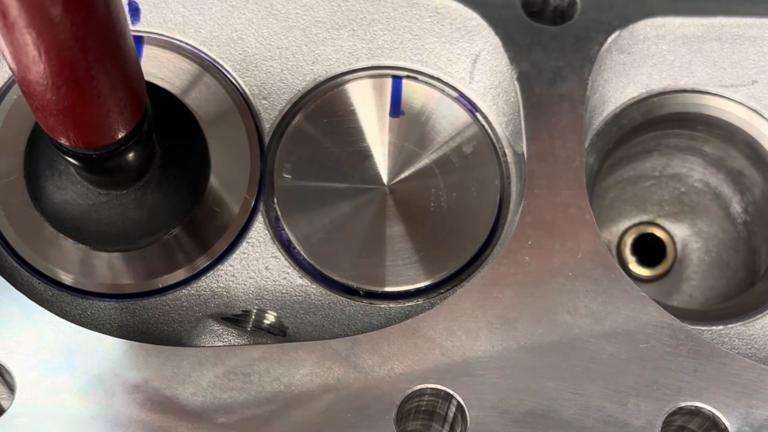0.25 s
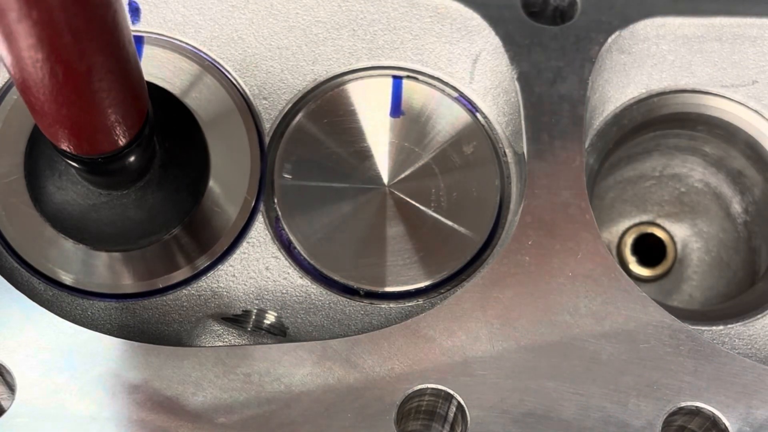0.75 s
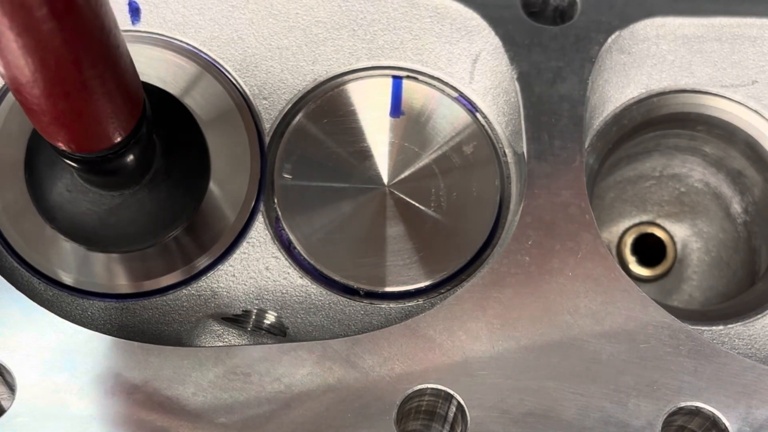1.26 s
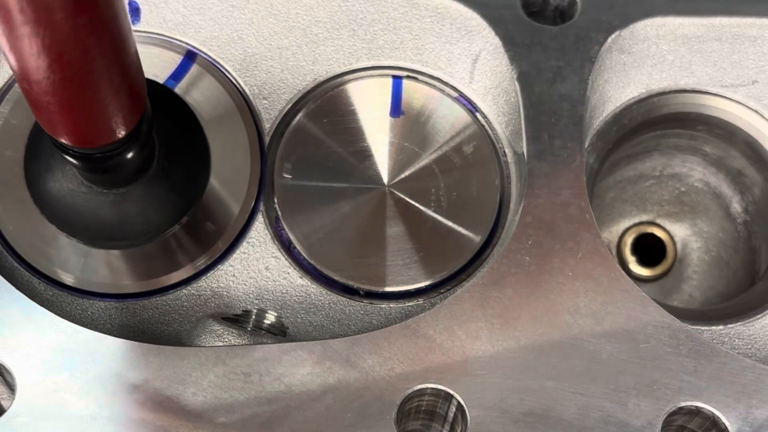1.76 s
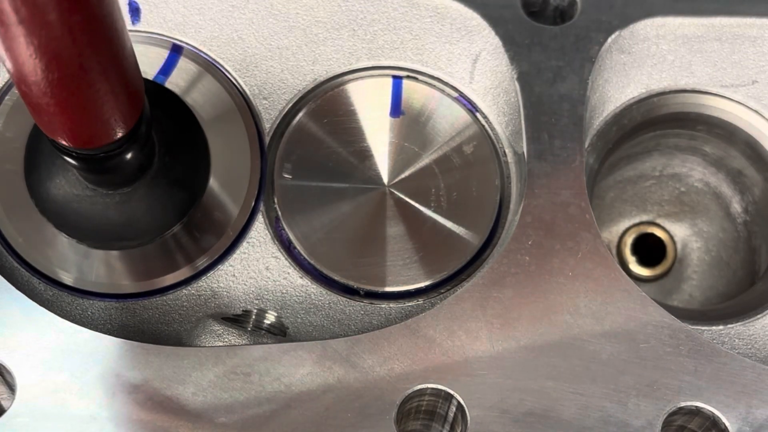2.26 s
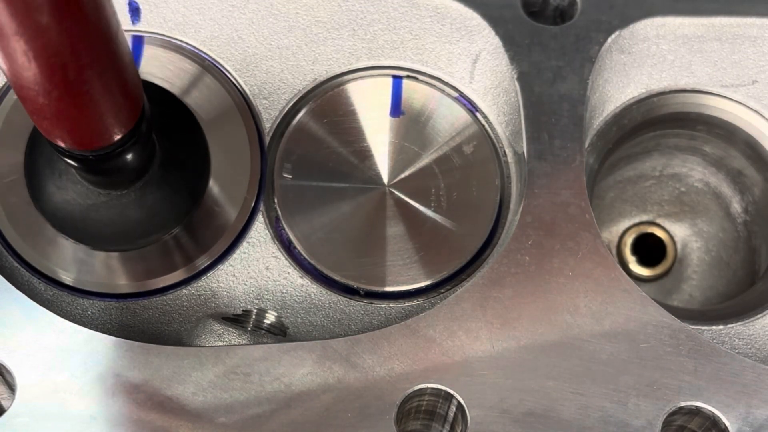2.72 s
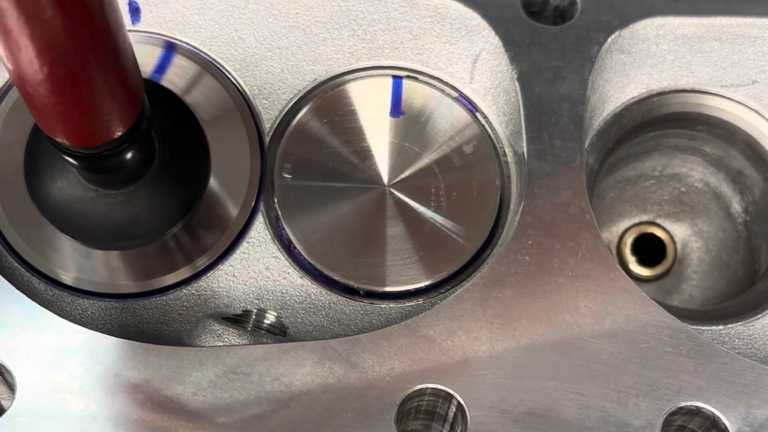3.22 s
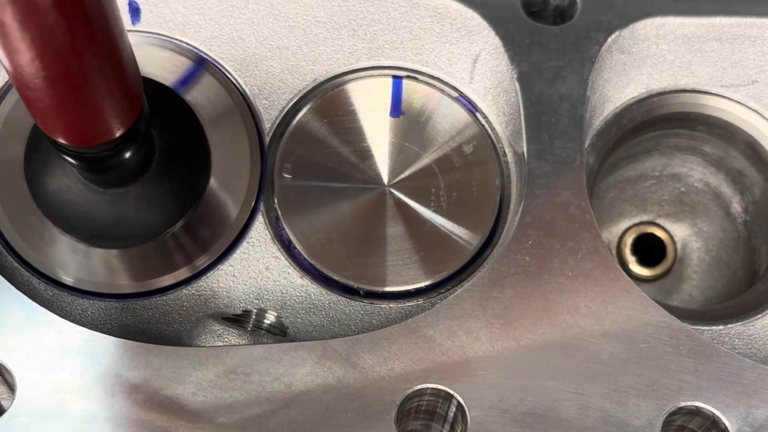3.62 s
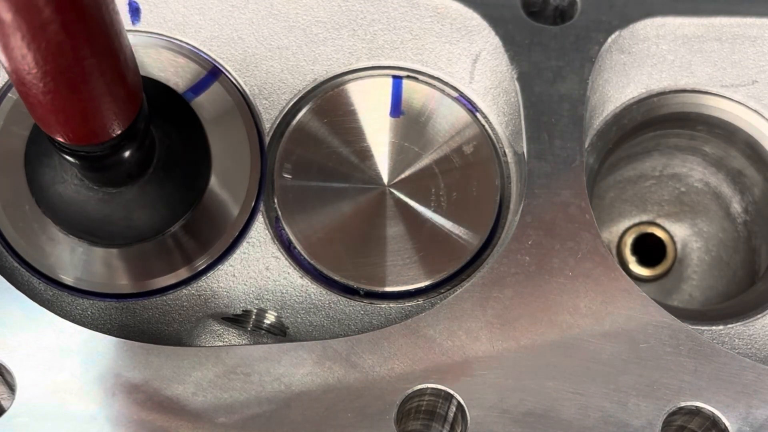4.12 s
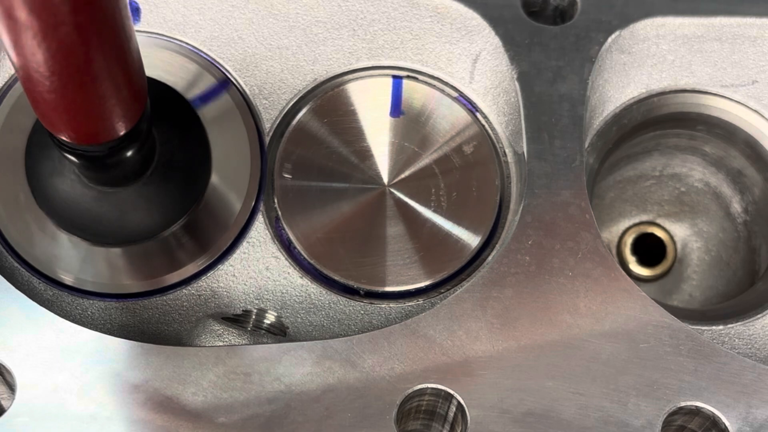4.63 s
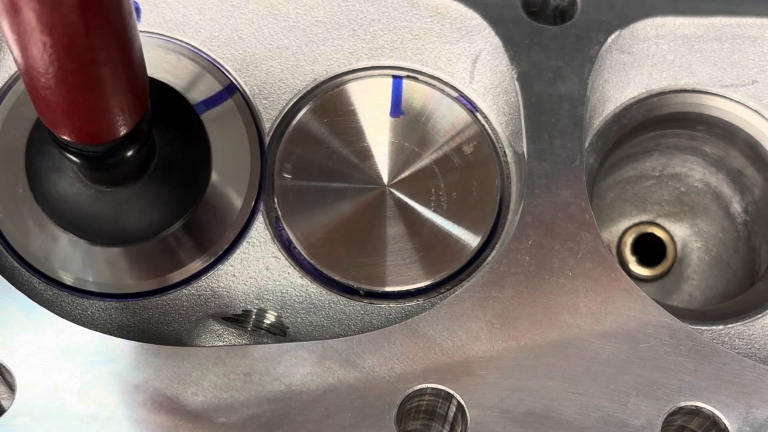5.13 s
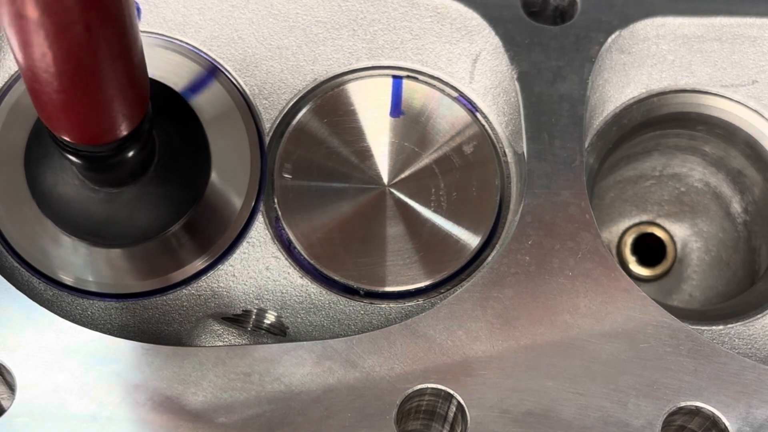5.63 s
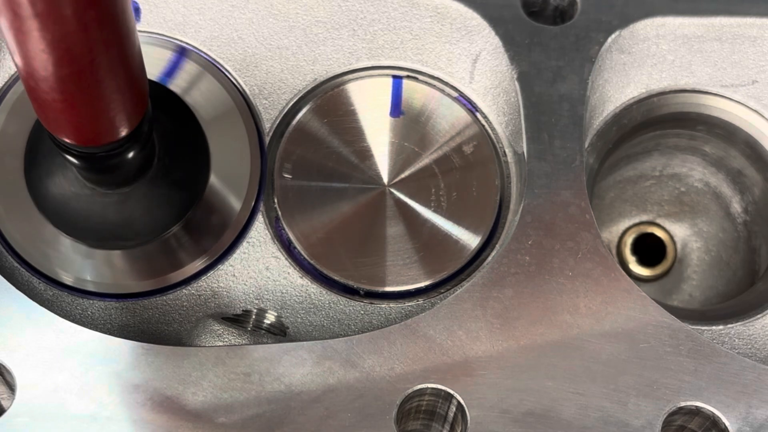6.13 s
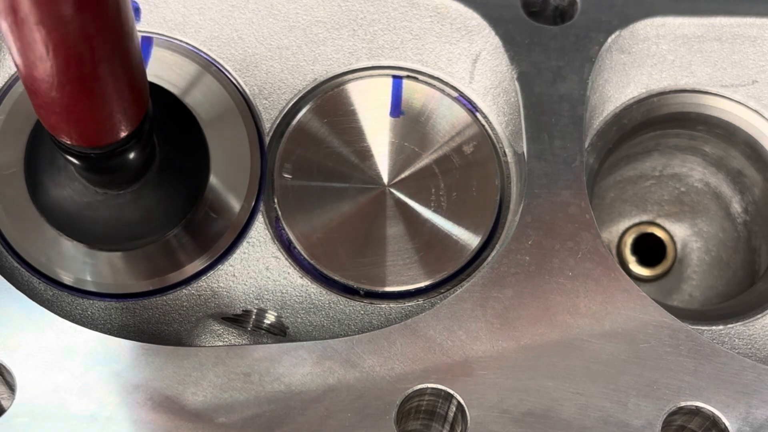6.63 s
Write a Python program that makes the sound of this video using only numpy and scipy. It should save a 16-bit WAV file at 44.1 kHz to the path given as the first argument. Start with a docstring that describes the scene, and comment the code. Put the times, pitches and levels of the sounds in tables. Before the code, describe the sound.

Close up in stereo, abrasive paste grinds between a valve and a metal casting. First only faint motor hum and rumble, then rapid even rasping strokes, softer at first and sliding slightly in pitch, soon crisper with a ringing, fizzy edge. A short lull comes around four seconds, with a tick, before the steady scrubbing resumes and runs on until it is cut off. The room adds a small, short echo.

```python
"""A valve is lapped in a cylinder head: a suction-cup stick twirls it to and fro, seven strokes a second.
Grit in abrasive paste is made from noise and random cracks, then filtered by the ringing of valve and head.
The sound falls quiet at each reversal; single grains snap, a scraping note slides, the stick knocks softly.
Machines hum low in the small workshop: steady tones, rumble and hiss. Two microphones sit close above the head."""
import sys
import numpy as np
from scipy import signal
from scipy.fft import rfft, irfft, next_fast_len
from scipy.io import wavfile
from scipy.ndimage import map_coordinates

SR = 44100
rng = np.random.default_rng(int(sys.argv[2]) if len(sys.argv) > 2 else 0)


def output_pcm(signal):
    """Save a mono or channel-first signal as 16-bit PCM at the path in sys.argv[1].

    Samples are clipped to [-1, 1] before scaling.
    """
    pcm = np.clip(np.atleast_2d(signal).T, -1, 1) * 32767
    wavfile.write(sys.argv[1], SR, np.round(pcm).astype(np.int16))


N = 302967  # length in samples


def amp(db):
    """Turn decibels into a gain."""
    return 10 ** (np.asarray(db) / 20)


def unit(x):
    """Scale to an average strength (rms) of 1."""
    return x / np.sqrt(np.mean(np.abs(x) ** 2) + 1e-20)


def along(points, hz):
    """Read values between (pitch_hz, value) points, on a log pitch axis."""
    point_hz, values = np.transpose(points)
    return np.interp(np.log(hz + 1), np.log(point_hz + 1), values)


def wobble(rate):
    """A smooth random curve with this many random points a second."""
    knots = rng.standard_normal(int(N * rate / SR) + 4)
    return map_coordinates(knots, [np.arange(N) * rate / SR])


def filtered(x, response):
    """Change the strength (or phase) of each frequency in x."""
    size = next_fast_len(N + SR // 2)
    hz = np.fft.rfftfreq(size, 1 / SR)
    return irfft(rfft(x, size) * response(hz), size)[..., :N]


def noise(spectrum):
    """Two unrelated noises in the given colour, scaled together to rms 1."""
    return unit(filtered(rng.standard_normal((2, N)), lambda hz: amp(along(spectrum, hz))))


def ring(x, gain):
    """A filter with this gain over frequency that only rings after each impact, never before it."""
    cepstrum = irfft(np.log(np.maximum(gain, 1e-6)))
    half = len(cepstrum) // 2
    # folding the second half onto the first makes the filter start at once (minimum phase)
    cepstrum[1:half] *= 2
    cepstrum[half + 1:] = 0
    impulse = irfft(np.exp(rfft(cepstrum)))
    return signal.fftconvolve(x, impulse[None], axes=1)[:, :N]


# steady tones of motors and mains: pitch_hz, relative level_db
MACHINE_TONES = [(59.2, -54.5), (72.0, -47.5), (119.8, -51), (144.0, -59.5), (177.6, -65.5), (240.2, -70.5),
                 (257.7, -66)]
# colour of the machine rumble: pitch_hz, relative level_db
RUMBLE_COLOUR = [(20, -29), (38, -21), (50, -9), (64, 1), (100, 1.5), (140, -1), (160, -13.5), (190, -16),
                 (230, -25.5), (300, -27), (450, -38), (900, -59)]
# colour of the room hiss: pitch_hz, relative level_db
AIR_COLOUR = [(200, -11), (500, 0.5), (1000, -0.5), (2500, -2), (4200, -4.5), (6000, -8), (8000, -26),
              (12000, -18), (14000, -15), (15500, -30)]


def workshop():
    """Slightly unsteady motor tones over rumble and a faint hiss of air."""
    t = np.arange(N) / SR
    tones = np.zeros(N)
    for pitch_hz, level_db in MACHINE_TONES:
        phase = 2 * np.pi * (pitch_hz * t + rng.random()) + 0.45 * wobble(2.56)
        # 1.3351 is the peak height of a tone listed at 0 dB
        tones += 1.3351 * amp(level_db) * np.sin(phase)
    rumble = amp(-41.5 + 1.05 * wobble(8.3)) * noise(RUMBLE_COLOUR)
    air = amp(-71.5 + 0.33 * wobble(3.5)) * noise(AIR_COLOUR)
    return tones + microphones(rumble + air)


# single grains snapping at rest: start_s, level_db (before the metal colours them)
GRAIN_SNAPS = [(0.347, -59), (.968, -71), (2.714, -52), (2.862, -53), (3.165, -50), (4.252, -52),
               (4.277, -68)]


def ticks(decay_s=0.0026):
    """Short cracks of single grains while the valve stands still: noise that dies away at once."""
    t = np.arange(N) / SR
    envelope = np.zeros(N)
    for start_s, level_db in GRAIN_SNAPS:
        envelope += amp(level_db) * (t > start_s) * np.exp(-np.abs(t - start_s) / decay_s)
    return rng.standard_normal((2, N)) * envelope


# twists of the stick: start_s, length_s, strength_db
STICK_STROKES = [(0.981, 0.13, -37), (1.12, 0.18, -36), (1.322, 0.13, -37.5), (1.474, 0.12, -37),
                 (1.611, 0.13, -36), (1.765, 0.13, -37), (1.905, 0.12, -37), (2.032, 0.11, -36),
                 (2.162, 0.1, -36), (2.316, 0.091, -38.5), (2.437, 0.11, -34.5), (2.573, 0.12, -36.5),
                 (2.727, 0.11, -33.5), (2.874, 0.13, -33.5), (3.03, 0.13, -33.5), (3.174, 0.11, -36.5),
                 (3.307, 0.12, -33), (3.445, 0.13, -35.5), (3.589, 0.11, -34), (3.721, 0.11, -34),
                 (3.844, 0.094, -35.5), (3.984, 0.041, -49.5), (4.17, 0.067, -47), (4.299, 0.11, -35.5),
                 (4.429, 0.14, -34), (4.585, 0.11, -35.5), (4.754, 0.12, -35), (4.884, 0.13, -32),
                 (5.024, 0.12, -33), (5.153, 0.11, -35.5), (5.287, 0.11, -34), (5.415, 0.13, -33),
                 (5.562, 0.12, -33.5), (5.692, 0.11, -34.5), (5.82, 0.11, -33), (5.953, 0.13, -32),
                 (6.095, 0.12, -32.5), (6.231, 0.13, -33), (6.373, 0.12, -32.5), (6.502, 0.13, -33.5),
                 (6.646, 0.12, -33), (6.784, 0.12, -33)]
USUAL_DB, USUAL_S = -35, 0.12  # strength and length of a usual stroke
# top speed comes at this share of a usual stroke, and later in a longer one
FASTEST, LATER_PER_S = 0.45, 1.96
# share of the swing taken up by the rubber cup; time the speed takes to rise
BREAKAWAY, ATTACK_S = 0.12, 0.0048
# first bite of a stroke, and its gain after a long rest
BITE_DB, STUCK_DB = 2, 3
# settling time of the paste, and the moment of the bite
SETTLE_S, BITE_S = 0.11, 0.015


def motion():
    """Sliding speed, progress (0-1), strength (dB over usual) and bite (dB) of the stroke under way."""
    t = np.arange(N) / SR
    starts, lengths, strengths_db = np.transpose(STICK_STROKES)
    previous_ends = np.append(0, (starts + lengths)[:-1])
    rests = np.maximum(starts - previous_ends, 0)
    now = np.maximum(np.searchsorted(starts, t) - 1, 0)
    age = np.maximum(t - starts[now], 0)
    progress = np.clip(age / lengths[now], 0, 1)
    fastest = np.clip(FASTEST + LATER_PER_S * (lengths[now] - USUAL_S), 0.35, 0.65)
    skew = np.log((0.5 - BREAKAWAY) / (1 - BREAKAWAY)) / np.log(fastest)
    # the rubber cup winds up, then the valve breaks free already at some speed
    swing = np.abs(np.sin(np.pi * (BREAKAWAY + (1 - BREAKAWAY) * progress ** skew)))
    speed = swing * (1 - np.exp(-age / ATTACK_S))
    # settled paste bites just after the valve breaks free, the harder the longer it has rested
    bite_peak_db = BITE_DB + STUCK_DB * (1 - np.exp(-rests[now] / SETTLE_S))
    bite_db = bite_peak_db * np.exp(-(2 * (age - BITE_S) / BITE_S) ** 2)
    return speed, progress, strengths_db[now] - USUAL_DB, bite_db


def grit(speed, grains_per_s, spread, coarse_share, judder_db):
    """Fine abrasive hisses; coarse grains crack singly, more often the faster the valve slides."""
    hit = rng.random(N) < grains_per_s * speed / SR
    size = np.exp(np.clip(spread * rng.standard_normal(N), -2, 2))
    coarse = unit(hit * size * rng.standard_normal((2, N))) * np.sqrt(np.mean(speed))
    fine = rng.standard_normal((2, N))
    share = np.clip(coarse_share, 0, 1)
    force = np.sqrt(share) * coarse + np.sqrt(1 - share) * fine
    # the paste film catches and lets go unevenly
    return force * unit(amp(judder_db * wobble(260)))


def ripple(hz, spacing_hz):
    """Random peaks and dips over frequency: the crowd of lesser resonances in a casting."""
    return map_coordinates(rng.standard_normal(int(SR / spacing_hz)), [hz / spacing_hz])


# broad colour of the grinding: pitch_hz, relative level_db
SCRAPE_COLOUR = [(150.0, -40), (300.0, -18.5), (500.0, -13.5), (900.0, -12), (1500.0, -13.5),
                 (1900.0, -11.5), (3000.0, -26), (4600.0, -19), (6000.0, -17.5), (8000.0, -33.5),
                 (11200.0, -13.5), (13000.0, -23), (14000.0, -27), (15700.0, -32)]
# resonances of port, head and valve: pitch_hz, width_hz, relative level_db
METAL_RESONANCES = [(543, 44, -7), (676, 92, -8), (875, 51, -5.5), (1213, 123, -4), (1358, 63, -3.0),
                    (2720, 300, -15), (3483, 600, -14), (3915, 83, 5), (4008, 172, 2), (4227, 124, 1.5),
                    (4395, 910, -7.5), (6820, 97, -4), (9350, 650, -16), (9490, 1000, -9.5),
                    (10565, 260, -3)]


def metal(hz, detune):
    """Gain of the metal over frequency: the grinding colour plus resonances shifted by a factor."""
    power = amp(along(SCRAPE_COLOUR, hz)) ** 2
    for pitch_hz, width_hz, level_db in METAL_RESONANCES:
        offset = 2 * (hz - pitch_hz * detune) / width_hz
        power = power + amp(level_db) ** 2 / (1 + offset ** 2) ** 2
    return unit(np.sqrt(power))


# slowly dying tones of the valve stem and casting: pitch_hz, t60_s (time to fall 60 dB), relative level_db
STEM_TONES = [(523, .15, -12), (558, .16, -11), (1001, .13, -10), (1064, .13, -9), (1205, .11, -2),
              (1238, .15, 0), (1366, .15, -3), (2685, .08, -16)]


def rings(force):
    """The grit drives narrow resonances that go on singing through each reversal."""
    t = np.arange(SR // 2) / SR
    tones = np.zeros(len(t))
    for pitch_hz, t60_s, level_db in STEM_TONES:
        tones += amp(level_db - 60 * t / t60_s) * np.sin(2 * np.pi * pitch_hz * t) / np.sqrt(t60_s)
    return signal.fftconvolve(force, tones[None] / np.linalg.norm(tones), axes=1)[:, :N]


def loudness(part, effort_db, speed):
    """Gain of one part: it grows with the strength of the stroke and with the sliding speed."""
    level_db, growth, power = part
    return amp(level_db + growth * effort_db) * speed ** power


# the four parts of the grinding: level_db in a usual stroke, growth (dB per dB of strength), power of the speed
HEAD_PART = (-33, 0.49, 0.99)
VALVE_PART = (-34.5, 1.46, 2.01)
FIZZ_PART = (-32.5, 1.33, 1.92)
CHATTER_PART = (-46, 0.49, 0.57)
# fresh paste softens the head's sound until it has spread
CUSHION_DB, SPREAD_S = 5, 0.23


def lapping(head_edge_hz=2900, fizz_edge_hz=6500, shift=0.011):
    """Grit drives the metal: the low head follows the speed, valve and bright fizz need a fast slide."""
    speed, progress, effort_db, bite_db = motion()
    grains = grit(speed, grains_per_s=2000, spread=0.23, coarse_share=0.29, judder_db=0.8)
    force = amp(bite_db) * grains
    hz = np.fft.rfftfreq(8192, 1 / SR)
    crowd = amp(2.3 * ripple(hz, 55) * np.minimum(hz / fizz_edge_hz, 1))
    colour = unit(metal(hz, 0.99) * crowd)
    # shares of the power below the head's edge and above the fizz's edge
    low = 1 / (1 + (hz / head_edge_hz) ** 12)
    high = 1 - 1 / (1 + (hz / fizz_edge_hz) ** 12)

    worked_s = np.cumsum(speed) / SR
    cushion = amp(-CUSHION_DB * np.exp(-worked_s / SPREAD_S))
    head = ring(force * cushion * loudness(HEAD_PART, effort_db, speed), colour * np.sqrt(low))
    fizz = ring(force * loudness(FIZZ_PART, effort_db, speed), colour * np.sqrt(high))

    # the contact wanders round the seat, and the valve's resonances move with it
    seat = np.pi / 4 * (1 + np.tanh(4.5 * wobble(16)))
    valve_drive = force * loudness(VALVE_PART, effort_db, speed)
    valve_band = np.sqrt((1 - low) * (1 - high))
    valve = np.zeros((2, N))
    for weight, detune in [(np.cos(seat) ** 2, 1 - shift), (np.sin(seat) ** 2, 1 + shift)]:
        valve += ring(valve_drive * weight, valve_band * unit(metal(hz, detune)))

    # slowing down, the stem chatters in its guide, more at some moments than at others
    chatter_drive = force * loudness(CHATTER_PART, effort_db, speed)
    chatter = rings(chatter_drive * amp(3.2 * wobble(7.7)) * progress)
    return head + valve + fizz + chatter + ring(ticks(), np.sqrt(colour))


# a scraping note that slides during a stroke: start_s, end_s, from_hz, to_hz, level_db (at its middle)
SLIDING_NOTES = [(1.008, 1.115, 780, 1280, -47), (1.33, 1.411, 1050, 1291, -49),
                 (1.62, 1.719, 1182, 823, -52)]


def slides(width_hz=55):
    """A narrow band of the scraping glides in pitch: slow noise carried on a sliding tone."""
    t = np.arange(N) / SR
    out = np.zeros((2, N))
    for start_s, end_s, from_hz, to_hz, level_db in SLIDING_NOTES:
        progress = np.clip((t - start_s) / (end_s - start_s), 0, 1)
        phase = 2 * np.pi * np.cumsum(from_hz + (to_hz - from_hz) * progress) / SR
        slow_noise = filtered(rng.standard_normal((2, 2, N)), lambda hz: np.exp(-(hz / width_hz) ** 2))
        a, b = unit(slow_noise)
        envelope = np.sqrt(np.abs(np.sin(np.pi * progress)))
        out += amp(level_db) * envelope * (a * np.cos(phase) + b * np.sin(phase))
    return out


# soft knocks of the stick: middle_s, pitch_hz, level_db (at the middle)
STICK_KNOCKS = [(1.152, 297, -44.5)]


def bumps(length_s=0.021):
    """The stick gives a dull knock as the hands settle on it: a short swell of low noise."""
    t = np.arange(N) / SR
    out = np.zeros((2, N))
    for middle_s, pitch_hz, level_db in STICK_KNOCKS:
        band = lambda hz: np.exp(-((hz - pitch_hz) / 80) ** 2)
        thud = unit(filtered(rng.standard_normal((2, N)), band))
        out += amp(level_db) * thud * np.exp(-((t - middle_s) / length_s) ** 2)
    return out


# how long the echo lasts: pitch_hz, t60_s (time to fall 60 dB)
ECHO_TIME = [(200, 0.85), (1200, 0.074), (4000, 0.3), (12000, 0.62)]
# how loud the echo is: pitch_hz, level_db
ECHO_LEVEL = [(300, -11), (1200, -15.5), (2500, -15.5), (4000, -23), (10000, -24)]


def room(x, delay_s=0.005):
    """The walls answer with a fading tail of noise, longest and loudest in the lows."""
    hz, t, z = signal.stft(rng.standard_normal((2, SR // 2)), SR, nperseg=256)
    t60_s = along(ECHO_TIME, hz)[:, None]
    tail = signal.istft(z * amp(-60 * t / t60_s) / np.sqrt(t60_s), SR, nperseg=256)[1]
    echo = signal.fftconvolve(x, tail / np.linalg.norm(tail[0]), axes=1)[:, :N]
    return filtered(echo, lambda hz: amp(along(ECHO_LEVEL, hz)) * np.exp(-2j * np.pi * hz * delay_s))


# how alike left and right are: pitch_hz, likeness (1 in step, -1 opposed; clipped near these)
LIKENESS = [(60, 1), (300, 0.54), (850, 0.88), (1180, 0.35), (1370, -0.74), (1850, 0.71), (2650, 0.43),
            (3050, 0.86), (4400, 0.7), (5700, -0.16), (6700, -0.987), (8000, -1.06), (9300, -0.039),
            (12000, 1), (13600, .99), (15500, -0.05)]
# how much of the left-right difference keeps a fixed phase: pitch_hz, share of its power
FIXED_PHASE = [(100, .1), (700, .25), (1200, .05), (2000, .4), (4000, .5), (9000, .8)]


def microphones(pair):
    """The spaced pair hears some bands in step and others in opposition; scattered sound differs freely."""
    turn = lambda hz: np.arccos(np.clip(along(LIKENESS, hz), -0.997, 0.998)) / 2
    share = lambda hz: np.clip(along(FIXED_PHASE, hz), 0, 1)
    # a quarter-turned copy of the first noise plus the unrelated second one
    blend = lambda hz: np.array([-1j * np.sqrt(share(hz)), np.sqrt(1 - share(hz))])
    across = filtered(pair, blend).sum(axis=0)
    mid = filtered(pair[0], lambda hz: np.cos(turn(hz)))
    side = filtered(across, lambda hz: np.sin(turn(hz)))
    return np.array([mid + side, mid - side])


def scene():
    """The work on the bench, its echo and the workshop behind it."""
    bench = lapping() + slides() + bumps()
    return microphones(bench + room(bench)) + workshop()


def record(dry, fade_s=0.003, top_hz=15800):
    """A few milliseconds of fade-in give the sound a clean start; nothing is kept above top_hz."""
    t = np.arange(N) / SR
    fade_in = 1 - np.exp(-(t / fade_s) ** 2)
    return filtered(dry * fade_in, lambda hz: hz < top_hz)


dry = scene()
out = record(dry)
output_pcm(out)
```